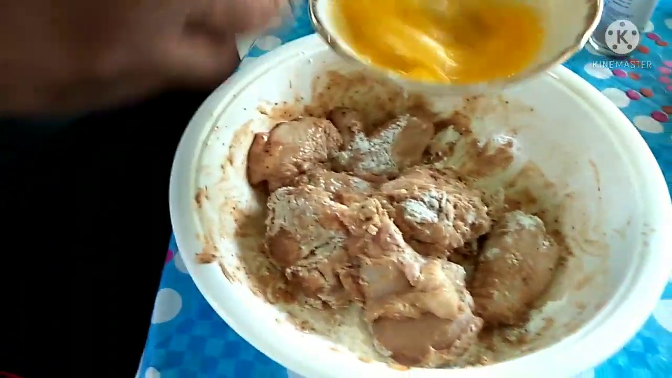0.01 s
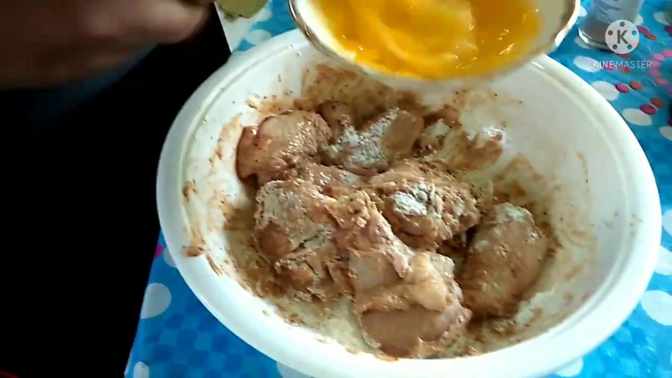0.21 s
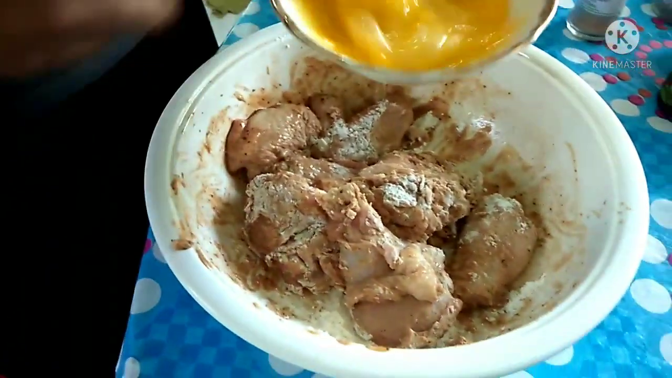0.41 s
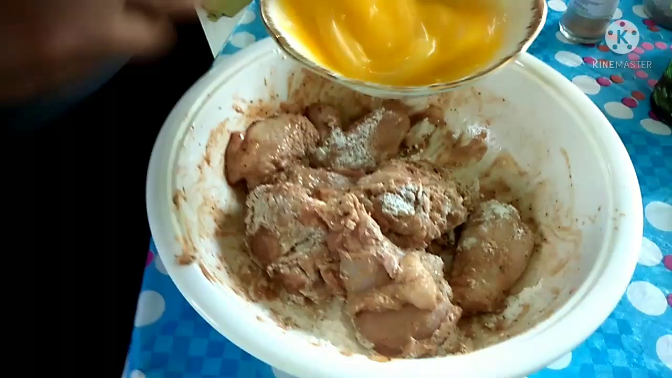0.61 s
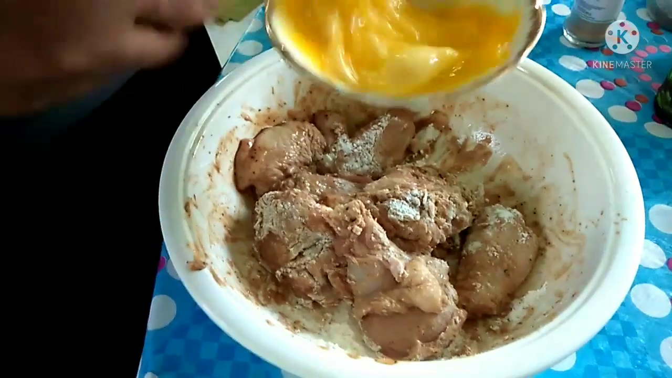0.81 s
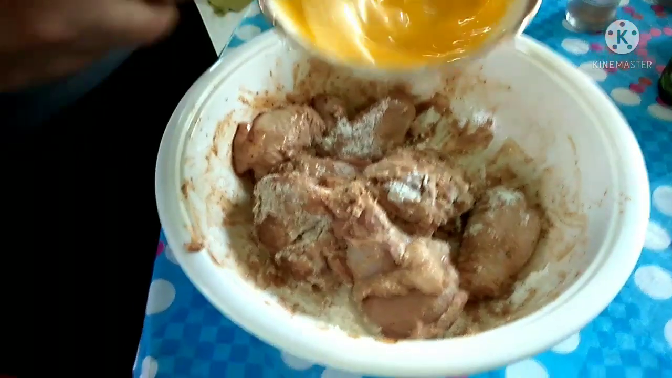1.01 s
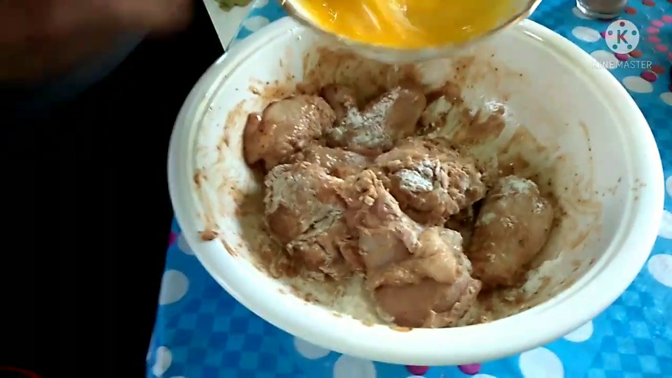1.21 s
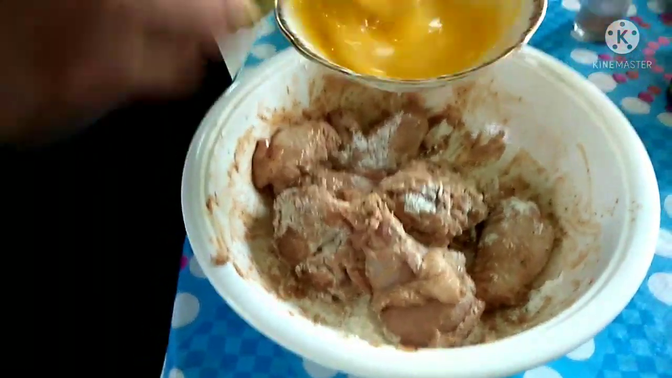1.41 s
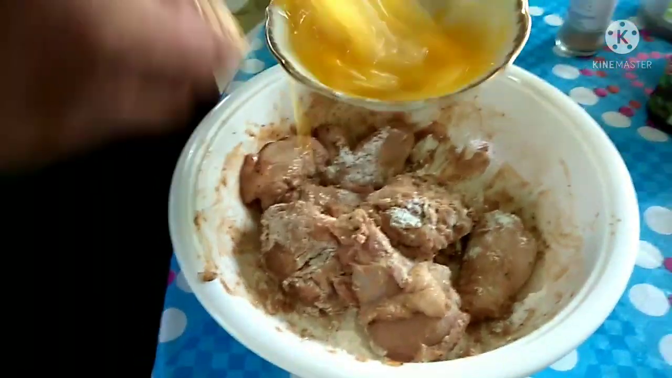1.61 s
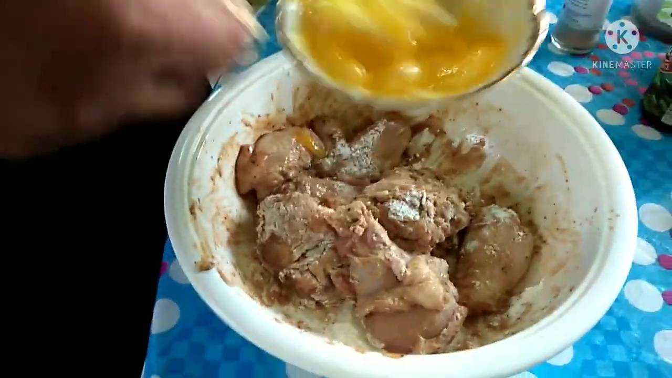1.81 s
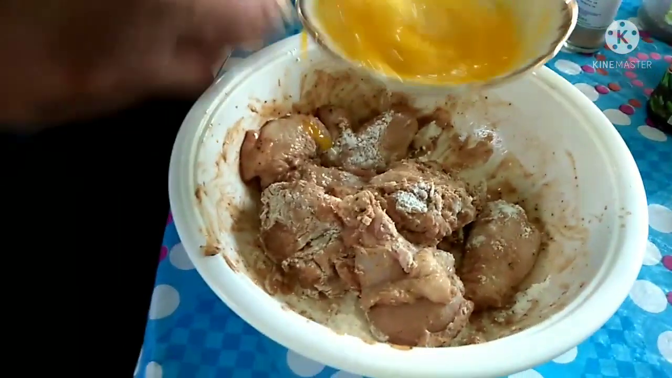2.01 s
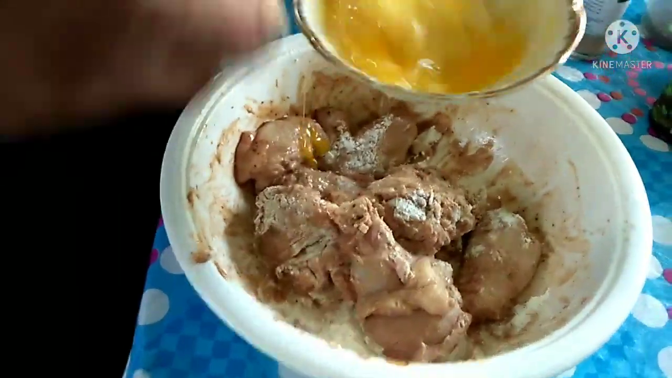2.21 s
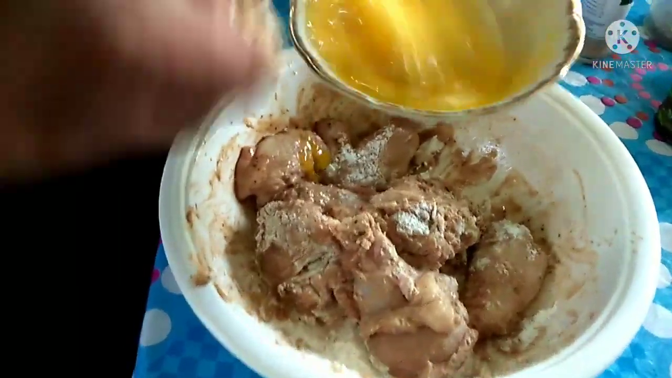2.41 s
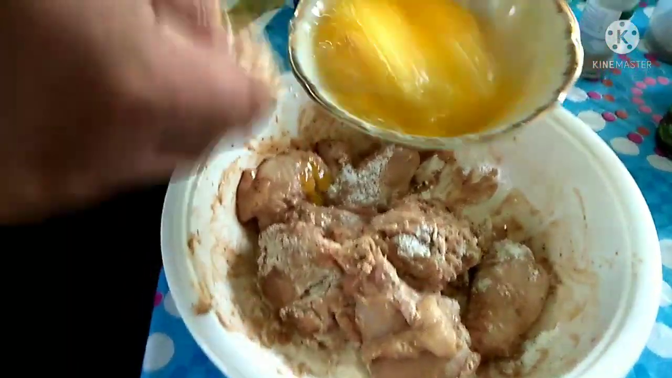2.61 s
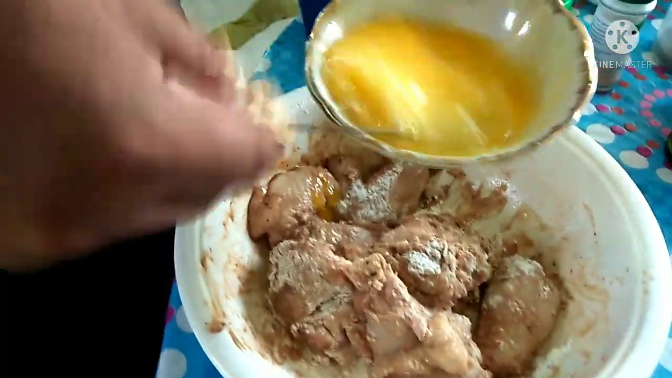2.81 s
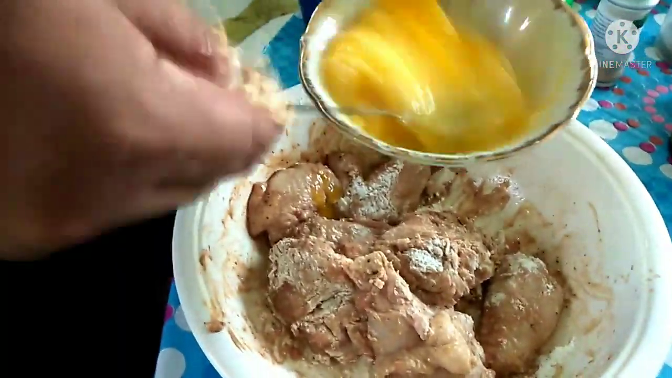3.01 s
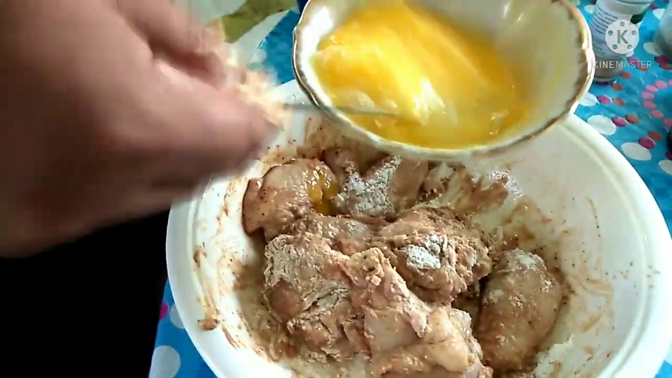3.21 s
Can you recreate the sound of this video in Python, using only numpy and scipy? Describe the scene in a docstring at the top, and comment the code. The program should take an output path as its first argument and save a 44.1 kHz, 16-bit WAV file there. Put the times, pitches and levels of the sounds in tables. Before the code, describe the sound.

A fork beats eggs in a small hand-held ceramic bowl, about five quick strokes a second, each a short damped clink with wet slosh, popping bubbles and froth fizz; close microphone in a small kitchen.

```python
"""In a kitchen, a fork beats eggs in a small hand-held ceramic bowl, about five strokes a second, close by.
Each touch knocks and scrapes, after a brief rise of bright noise: filtered noise and a sharp blow make
the damped bowl ring briefly. Trapped air pops as dying sines of rising pitch, and shaped noise makes the
egg slosh and the froth fizz. The room answers with near reflections and a noise tail.
Lumpy rumble, soft bumps and faint hiss lie below.
"""
import sys
import numpy as np
from scipy import signal
from scipy.fft import rfft, irfft, next_fast_len
from scipy.io import wavfile
from scipy.ndimage import uniform_filter1d, map_coordinates

SR = 44100
rng = np.random.default_rng(int(sys.argv[2]) if len(sys.argv) > 2 else 0)


def file_out(sig):
    """Save sig as 16-bit WAV at sys.argv[1]."""
    # one column per channel
    cols = np.atleast_2d(sig).T
    # limit, then scale
    lim = np.clip(cols, -1, 1)
    pcm = np.round(lim * 32767).astype(np.int16)
    wavfile.write(sys.argv[1], SR, pcm)


N = 145530  # length in samples

# Tone colour of the rumble: (frequency [Hz], level [dB])
RUMBLE_COLOUR = [(15, -10), (25, 8), (43, 6.5), (103, 13), (257, 6), (500, 0.5), (1100, -22.5)]
RUMBLE_DB, RUMBLE_SHARED = -70, 0.26  # shared: how much of each side is added to the other
RUMBLE_LEFT_DB = 2  # left minus right, for rumble and bumps
RUMBLE_LUMPS_DB, RUMBLE_LUMPS_PER_S = 5, 42  # random swelling of the rumble
# Soft low bumps from handling: (time [s], level [dB], frequency [Hz])
BUMPS = [(0.33, -55, 135), (0.459, -56.5, 116), (0.562, -52, 113), (0.788, -50.5, 86), (0.86, -48.5, 83.4),
         (0.97, -54, 127), (1.155, -55, 112), (1.276, -51, 126.3), (1.604, -57, 173), (1.855, -49, 122),
         (2.916, -54.5, 114),]
BUMP_S = 0.0068  # time for a bump to swell to its peak
# Tone colour of the faint hiss: (frequency [Hz], level [dB])
HISS_COLOUR = [(250, -20), (1000, 1), (3000, -4), (6000, -23), (15800, -34.5)]
HISS_DB = -75

# Dying away of the room's tail: (frequency [Hz], time to fall 60 dB [s])
ROOM_DECAY = [(200, 0.31), (530, 0.29), (1400, 0.3), (3700, 0.25), (9700, 0.28)]
# Likeness of the room's tail at left and right: (frequency [Hz], likeness [0 to 1])
ROOM_LIKENESS = [(200, 0.26), (700, 0.77), (1400, 0.054), (3000, 0)]
ROOM_DB, ROOM_BUILDS_S = -9, 0.0031  # the tail's strength and its time to build up
WALL_DB, WALL_S = -17, 0.014  # near reflections: strength of each and longest delay drawn

# Egg slopping in the bowl: (frequency [Hz], level [dB])
SLOSH_COLOUR = [(250, -9.5), (450, -16.5), (800, -4.5), (1400, -6.5), (2200, -12.5), (4000, -42)]
SLOSH_DB, SLOSH_T60_S = 9.5, 0.07  # T60: time to fall 60 dB

# Tone colour of the fizzing froth: (frequency [Hz], level [dB])
FIZZ_COLOUR = [(3530, -16.5), (6000, -14.5), (6690, -12.5), (7740, -10.5), (9520, -16), (10800, -7.5),
               (12600, -14), (13600, -7.5), (14900, -10), (15800, 8)]
FIZZ_DB, TREBLE_RISE_S, FIZZ_S = 7, 0.005, 0.054
FIZZ_BURST_DB, FIZZ_BURST_T60_S = 3, 0.051
PATCH_DB = 5  # unevenness of the fizz in time and pitch

# Small bubbles that pop after a contact; the spread is of the natural log of pitch
FROTH_DB, FROTH_WAIT_S, FROTH_HZ, FROTH_SPREAD, FROTH_CYCLES = -27.5, 0.025, 950, 0.646, 13.5

# Trapped air: times and cycle counts are for a 60 dB fall
POCKET_DB, POCKET_T60_S, SMALL_DB, SMALL_CYCLES = 5, 0.037, 7.5, 41
RISE = 0.0195  # pitch climbs by twice this share over the 60 dB fall
LINGER_DB, LINGER = -19, 4.06  # a faint second ring lasts this many times longer

# Ringing modes of the bowl with egg in it: (frequency [Hz], width [Hz], level [dB])
BOWL_MODES = [(696, 16, 1), (1143, 86, 2.5), (1215, 35, -20), (2250, 356, -4.5), (2586, 410, -0.5),
              (2980, 350, 1), (4105, 396, 1), (4276, 1210, 4.5), (4770, 328, 9.5), (5020, 450, 4),
              (5624, 217, 9.5)]
MODE_SCATTER, MODE_SCATTER_DB = 0.015, 2.5  # change from contact to contact: share of pitch, and level
MODE_SPLIT_HZ = 1500  # modes up to here follow the air pocket's strength, the rest the clink's
CLINK_DB, BLOW_DB = 3.5, 21.5
TOUCH_DB, TOUCH_T60_S = 3, 0.01  # a short grind after the blow
LEAD_IN_DB, LEAD_IN_S, LEAD_IN_ABOVE_HZ = 2, 0.0039, 4000  # faint bright noise rising just before each contact
CHATTER_DB, CHATTER_S, CHATTER_GRAIN_DB = -26, 0.053, 4.5  # tines scrape on over the glaze
TICK_DB, TICK_WAIT_S = 6.5, 0.045  # stray tine ticks after a contact

# Fork contacts: (time [s], level [dB], air pocket [Hz], small pocket [Hz], pocket level [dB],
#                 small pocket level [dB], clink level [dB], fizz level [dB])
CONTACTS = [(0.002, -38, 1033, 3840, -10, -15, -11, -15.5),
            (0.024, -25, 736, 2640, -20, -20.5, -28.5, -12.5),
            (0.057, -35, 1350, 2005, -10, -15.5, -28, -36), (0.176, -44.5, 1040, 3170, -3.5, -3, -34, -48),
            (0.21, -16.5, 823, 2800, -26.5, -49, -11.5, -16.5),
            (0.251, -31, 475, 2680, -20, -21, -22, -12.5), (0.363, -25, 615, 3120, -19, -28, -28, -28),
            (0.387, -10, 1190, 3050, -27, -27, -13, -14), (0.401, -22, 950, 2860, -17.5, -32, -8.5, -8.5),
            (0.551, -29, 662, 1100, -5.5, -18, -18, -20), (0.577, -39.5, 790, 3100, -25, 0, -20, -30),
            (0.6, -10.5, 748, 1370, -19.5, -23.5, -13.5, -19.5),
            (0.615, -25.5, 973, 2590, -10, -8, -30, -32), (0.651, -23, 403, 2340, -6.5, -18.5, -43, -18),
            (0.756, -28.5, 1172, 3070, -9.5, -20, -26.5, -28),
            (0.798, -10, 857, 2640, -21, -17.5, -15.5, -21), (0.829, -23, 790, 2000, -9.5, -14.5, -30, -21),
            (0.969, -26.5, 1042, 3110, -9, -5.5, -9, -10.5),
            (0.994, -16.5, 1119, 2625, -13.5, -4.5, -5.5, -9.5),
            (1.163, -32, 1150, 3120, -32, -1, -19, -39), (1.187, -15, 1064, 2226, -15.5, -15, -8, -13.5),
            (1.21, -42, 1070, 4480, -24, 0, -28, 0), (1.355, -25, 720, 2690, -12.5, -26, -19.5, -17.5),
            (1.372, -13, 777, 2560, -15, -28.5, -7, -14), (1.546, -52, 760, 2920, -33, -8, -26, -5),
            (1.579, -24, 1093, 2905, -12, -12, -8.5, -9.5), (1.644, -34, 456, 4170, -12.5, -1, -11.5, -27),
            (1.772, -15.5, 990, 2980, -25, -18, -11, -15.5),
            (1.973, -20.5, 1086, 2980, -11.5, -7, -13.5, -8.5),
            (1.998, -15, 908, 3560, -21, -12.5, -7.5, -14), (2.136, -43.5, 1060, 3010, -9, -31, -32, -37),
            (2.16, -10.5, 987, 2980, -23.5, -13.5, -13, -21), (2.201, -28, 421, 2980, -4.5, -34, -28, -10),
            (2.236, -36, 466, 2956, -11.5, -0.5, -17, -26), (2.346, -16.5, 1101, 2970, -11, -26, -6.5, -10),
            (2.377, -25, 1118, 2970, -10.5, -26, -31, -14), (2.403, -37, 1146, 3120, -16, -4, -37, -14),
            (2.506, -19.5, 662, 2974, -14.5, -15, -36, -21), (2.546, -28, 685, 3230, -16, -20, -26, -7),
            (2.576, -31.5, 1048, 3620, -9.5, -25, -31, -16.5), (2.597, -46, 1080, 5370, -31, -3, -24, -29),
            (2.717, -21, 1003, 3180, -8, -17.5, -20, -27.5), (2.75, -17, 1086, 3030, -12.5, -12, -11, -15),
            (2.772, -29, 743, 3730, -8, -12, -37, -32), (2.887, -31.5, 707, 2870, -16, -7, -15, -24),
            (2.902, -28.5, 765, 3940, -10, -2.5, -12, -21), (2.94, -22, 1072, 3080, -6.5, -10, -7.5, -11.5),
            (2.971, -14, 1150, 3450, -15.5, -6.5, -9.5, -12), (3.108, -40, 1237, 2144, -9, -5, -7.5, -21),
            (3.138, -20, 478, 3260, -13, -15.5, -19.5, -21), (3.2, -48, 768, 3840, -4.5, -34, -34, -13),
            (3.296, -28, 1560, 2870, -34, -15.5, -23.5, -18)]
LEFT_LAG_S, LAG_SCATTER_S = 0.0001, 0.00005  # how much later the direct sound is on the left
# Left-right balance of the beating: (frequency [Hz], left minus right [dB])
BALANCE = [(60, 13), (110, 9.5), (200, 4), (380, -1.5), (700, 1), (1290, 1.5), (2380, 1), (4400, 4),
           (8120, 7), (15000, 4.5)]
# Microphone colour near the bowl: (frequency [Hz], level [dB])
MICROPHONE_COLOUR = [(60, -57), (150, -22.5), (350, -12), (600, -1), (1500, 1.5), (1800, -0.5), (2500, 4),
                     (5700, 3.5), (6500, -6.5), (8000, -3.5)]

LOW_CUT_HZ, TOP_HZ = 57, 15650  # limits of the whole sound


def amp(db):
    """Turn decibels into gain."""
    return 10 ** (np.asarray(db) / 20)


def unit(x):
    """Scale a sound to an rms (average strength) of 1."""
    return x / np.sqrt(np.mean(x ** 2) + 1e-20)


def along(points, hz):
    """Read a curve of (frequency, value) points along a log frequency axis."""
    f, v = np.transpose(points)
    return np.interp(np.log(hz + 1), np.log(f + 1), v)


def filtered(x, response):
    """Multiply the spectrum of a sound by a response that depends on frequency."""
    n = x.shape[-1]
    padded = next_fast_len(n + 2048)
    spectrum = rfft(x, padded) * response(np.fft.rfftfreq(padded, 1 / SR))
    return irfft(spectrum, padded)[..., :n]


def coloured(x, colour):
    """Shape a sound by a table of levels over frequency."""
    return filtered(x, lambda hz: amp(along(colour, hz)))


def stereo_noise(colour):
    """Steady coloured noise, drawn separately for left and right, with rms 1."""
    return unit(coloured(rng.standard_normal((2, N)), colour))


def rumble(t):
    """Low noise whose level wanders smoothly between random knots."""
    knots = rng.standard_normal(int(N / SR * RUMBLE_LUMPS_PER_S) + 4)
    lumps_db = RUMBLE_LUMPS_DB * map_coordinates(knots, [t * RUMBLE_LUMPS_PER_S])
    pair = stereo_noise(RUMBLE_COLOUR)
    return amp(RUMBLE_DB + lumps_db) * (pair + RUMBLE_SHARED * pair[::-1])


def bumps(t):
    """Handling bumps: low sines that swell quickly and die away."""
    out = np.zeros((2, N))
    for start, db, hz in BUMPS:
        u = np.maximum(t - start, 0) / BUMP_S
        swell = np.e * u * np.exp(-u)
        phase = rng.normal(0, 1, (2, 1))
        out += amp(db) * swell * np.sin(2 * np.pi * hz * t + phase)
    return out


def background():
    """Rumble and bumps, tilted between left and right, over steady hiss."""
    t = np.arange(N) / SR
    tilt = amp([[RUMBLE_LEFT_DB / 2], [-RUMBLE_LEFT_DB / 2]])
    return tilt * (rumble(t) + bumps(t)) + amp(HISS_DB) * stereo_noise(HISS_COLOUR)


def room_tail():
    """Stereo noise that dies at its own rate in each frequency band, like sound scattered in a room."""
    hz, t, z = signal.stft(rng.standard_normal((2, SR // 3)), SR, nperseg=256)
    # more of the shared middle makes the sides more alike
    turn = np.arccos(np.clip(along(ROOM_LIKENESS, hz), 0, 1))[:, None] / 2
    mid, side = z[0] * np.cos(turn), z[1] * np.sin(turn)
    decay = amp(-60 * t / along(ROOM_DECAY, hz)[:, None])
    tail = signal.istft(np.array([mid + side, mid - side]) * decay, SR, nperseg=256)[1]
    tail = tail * (1 - np.exp(-np.arange(tail.shape[1]) / (ROOM_BUILDS_S * SR)))
    return amp(ROOM_DB) * tail / np.linalg.norm(tail[0])


def room():
    """The room's answer to one click: six reflections from near surfaces, plus the tail."""
    tail = room_tail()
    walls = np.zeros_like(tail)
    delay = rng.uniform(0.15, 1, 6) * WALL_S * SR  # samples
    sign = rng.choice([-1, 1], 6)
    for ear in walls:
        ear[(delay + rng.uniform(0, 8, 6)).astype(int)] = amp(WALL_DB) * sign
    return tail + walls


def slosh(t, grain):
    """Egg slopping: grainy noise that starts at the contact and dies away."""
    fade = (t >= 0) * amp(-60 * np.maximum(t, 0) / SLOSH_T60_S)
    return coloured(grain * fade * rng.standard_normal(len(t)), SLOSH_COLOUR)


def splashy(size):
    """Stereo noise with patches of random gain over time and pitch."""
    z = signal.stft(rng.standard_normal((2, size)), nperseg=128)[2]
    patches = uniform_filter1d(rng.standard_normal(z.shape[1:]), size=3, axis=0)
    patches = uniform_filter1d(patches, size=10, axis=1)
    return unit(signal.istft(z * amp(PATCH_DB * unit(patches)), nperseg=128)[1][:, :size])


def fizz(t, grain):
    """Fizzing froth: patchy noise that bursts and fades, after a short rise of treble noise."""
    after, before = np.maximum(t, 0), np.minimum(t, 0)
    fade = np.sqrt(grain) * np.exp(-(after / FIZZ_S) ** 2)
    burst = amp(FIZZ_BURST_DB - 60 * after / FIZZ_BURST_T60_S)
    envelope = np.exp(before / TREBLE_RISE_S) * (fade + burst)
    return coloured(envelope * splashy(len(t)), FIZZ_COLOUR)


def pop(t, hz, cycles):
    """Trapped air: a sine of rising pitch that dies fast, with a fainter, longer ring."""
    u = np.maximum(t, 0) * hz  # cycles since the start
    wave = np.sin(2 * np.pi * u * (1 + RISE * u / cycles))
    fade = amp(-60 * u / cycles) + amp(LINGER_DB - 60 * u / cycles / LINGER)
    return wave * fade * (1 - np.exp(-u))


def froth(t):
    """Twenty small bubbles that pop at random moments after the contact."""
    wait, size_db = rng.exponential(FROTH_WAIT_S, 20), rng.exponential(2, 20)
    hz = FROTH_HZ * np.exp(FROTH_SPREAD * rng.standard_normal(20))
    return amp(size_db) @ pop(t - wait[:, None], hz[:, None], FROTH_CYCLES)


def bowl_response(pocket_db, clink_db):
    """The bowl as a sum of damped resonances, each slightly varied for this contact."""
    modes = []
    for hz, width, db in BOWL_MODES:
        strength_db = clink_db if hz > MODE_SPLIT_HZ else pocket_db
        gain = amp(db + rng.normal(0, MODE_SCATTER_DB) + strength_db)
        modes.append((hz * rng.normal(1, MODE_SCATTER), width, gain))

    def response(f):
        total = 0
        for k, (centre, width, gain) in enumerate(modes):
            damping = 1j * f * width
            total = total + (-1) ** k * gain * damping / (centre ** 2 - f ** 2 + damping)
        return total
    return response


def tine_ticks(t):
    """Eight stray single-sample ticks, with a strength that tends to fall with time."""
    at = np.searchsorted(t, rng.exponential(TICK_WAIT_S, 8))
    strength = amp(TICK_DB + rng.exponential(3, 8))
    ticks = np.bincount(at, strength, len(t) + 1)[:len(t)]
    return ticks * np.exp(-np.maximum(t, 0) / TICK_WAIT_S)


def clink(t, grain, pocket_db, clink_db):
    """Tines on glaze: blow, grind, scrape and ticks ring the bowl's resonances, after a bright lead-in."""
    bowl = bowl_response(pocket_db, clink_db)
    after, before = np.maximum(t, 0), np.minimum(t, 0)
    rise = (t < 0) * amp(LEAD_IN_DB) * np.exp(before / LEAD_IN_S)
    lead_in = rise * grain * rng.standard_normal(len(t))
    grind = amp(TOUCH_DB - 60 * after / TOUCH_T60_S)
    chatter = grain * amp(CHATTER_DB) * np.exp(-(after / CHATTER_S) ** 2)
    scrape = (t >= 0) * (grind + chatter) * rng.standard_normal(len(t))
    blow = amp(BLOW_DB) * (t == 0)
    ringing = filtered(scrape + tine_ticks(t) + blow, bowl)
    return ringing + filtered(lead_in, lambda f: bowl(f) * (f > LEAD_IN_ABOVE_HZ))


def contact(t, pocket_hz, small_hz, pocket_db, small_db, clink_db, fizz_db):
    """One touch of the fork in stereo; only the fizz differs by side, and t starts before the touch."""
    # random roughness that holds for 64 samples at a time
    steps = np.repeat(rng.standard_normal(len(t) // 64 + 1), 64)[:len(t)]
    grain = amp(CHATTER_GRAIN_DB * steps)
    return (amp(SLOSH_DB + pocket_db) * slosh(t, grain)
            + amp(FIZZ_DB + fizz_db) * fizz(t, grain)
            + amp(FROTH_DB) * froth(t)
            + amp(POCKET_DB + pocket_db) * pop(t, pocket_hz, POCKET_T60_S * pocket_hz)
            + amp(SMALL_DB + small_db) * pop(t, small_hz, SMALL_CYCLES)
            + amp(CLINK_DB) * clink(t, grain, pocket_db, clink_db))


def beating():
    """All contacts, each heard directly and through its own random draw of the room."""
    lead = SR // 40  # samples kept before each contact, for the rising noise
    t = (np.arange(SR // 4) - lead) / SR
    out = np.zeros((2, N + SR))
    for start, db, *voice in CONTACTS:
        direct = amp(db) * contact(t, *voice)
        heard = signal.fftconvolve(direct, room(), axes=1)
        lag = np.array([[rng.normal(LEFT_LAG_S, LAG_SCATTER_S)], [0]])
        heard[:, :len(t)] += filtered(direct, lambda hz: np.exp(-2j * np.pi * hz * lag))
        first = round(start * SR)
        out[:, first:first + heard.shape[1]] += heard
    half = np.array([[0.5], [-0.5]])  # half the balance to each side
    return filtered(out[:, lead:lead + N],
                    lambda hz: amp(along(MICROPHONE_COLOUR, hz) + half * along(BALANCE, hz)))


def scene():
    """Add the background and the beating in its room."""
    return background() + beating()


def record(dry):
    """Weaken the lowest bass and fade out everything above the top limit."""
    def response(hz):
        low_cut = hz ** 2 / (hz ** 2 + LOW_CUT_HZ ** 2)
        top_cut = np.clip((TOP_HZ - hz) / 400, 0, 1) ** 2
        return low_cut * top_cut
    return filtered(dry, response)


dry = scene()
out = record(dry)
file_out(out)
```